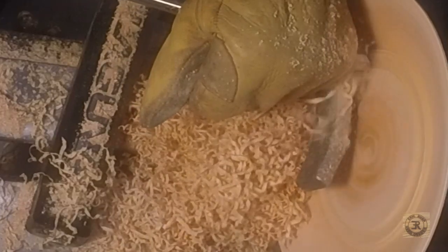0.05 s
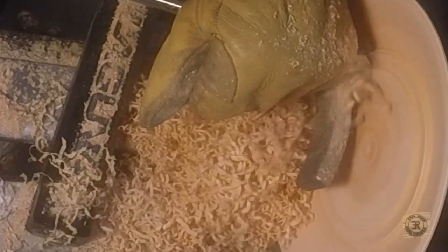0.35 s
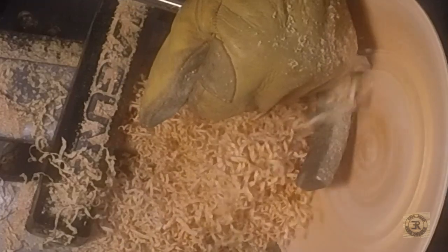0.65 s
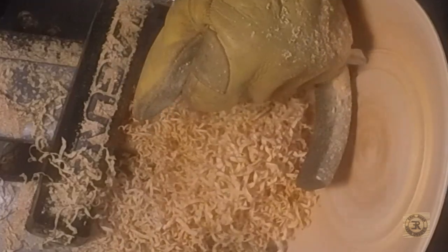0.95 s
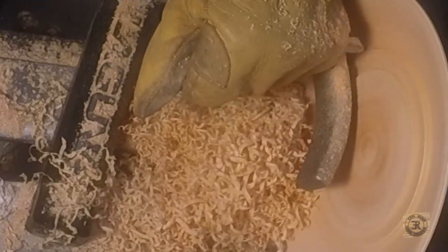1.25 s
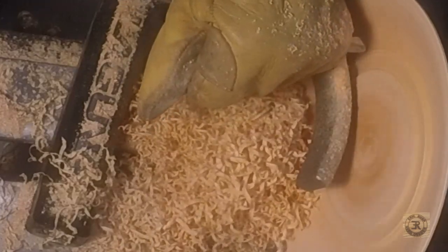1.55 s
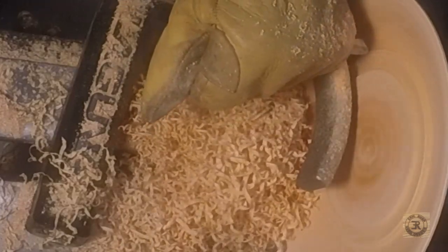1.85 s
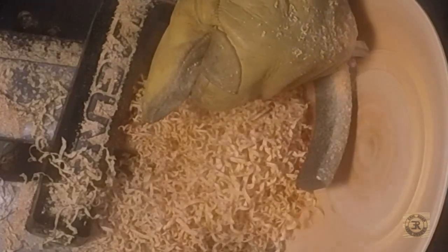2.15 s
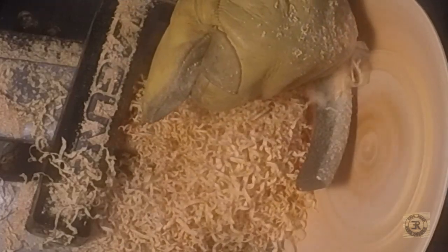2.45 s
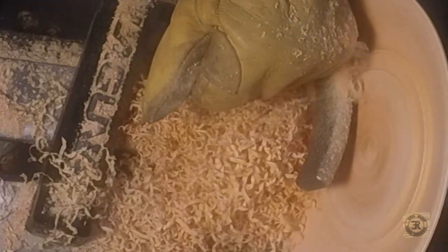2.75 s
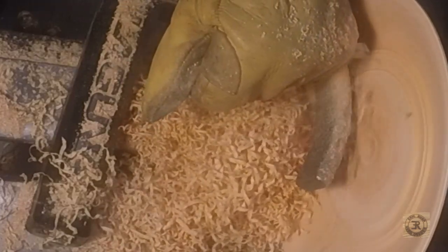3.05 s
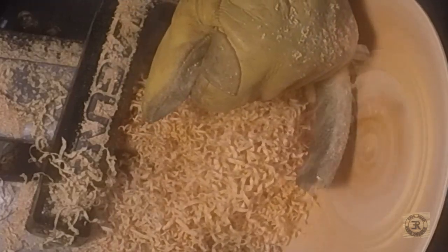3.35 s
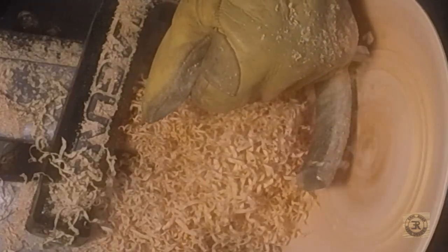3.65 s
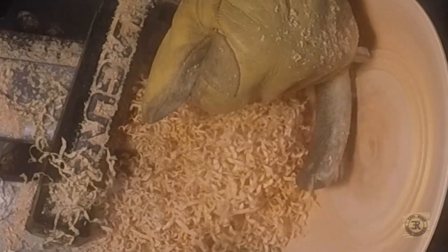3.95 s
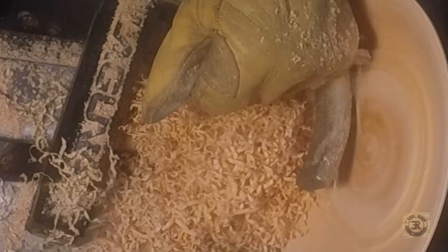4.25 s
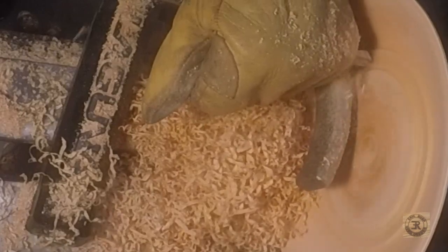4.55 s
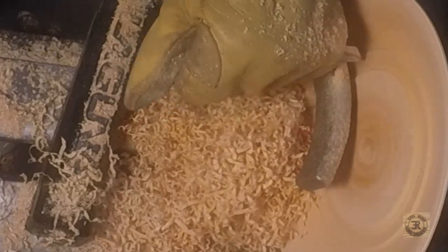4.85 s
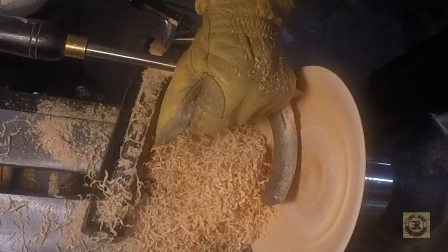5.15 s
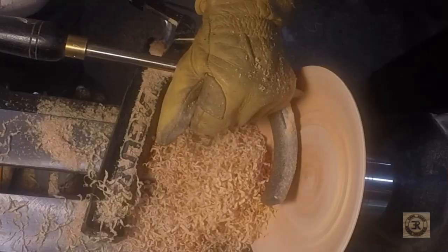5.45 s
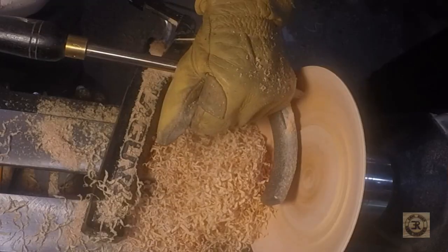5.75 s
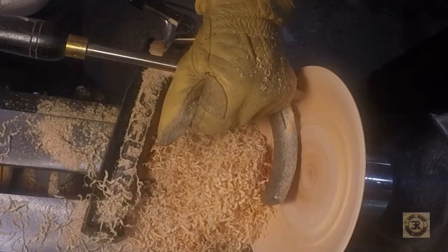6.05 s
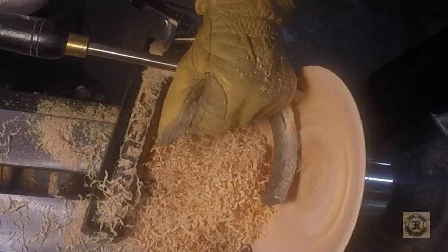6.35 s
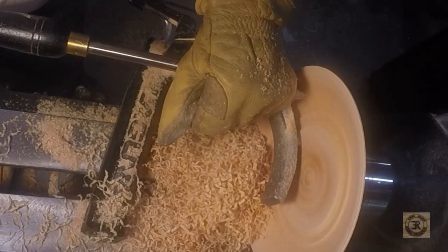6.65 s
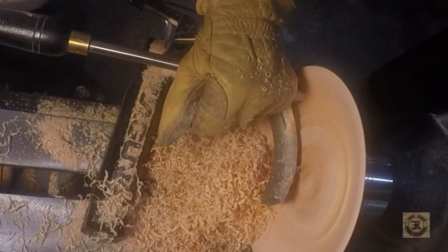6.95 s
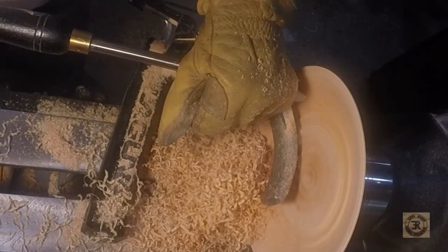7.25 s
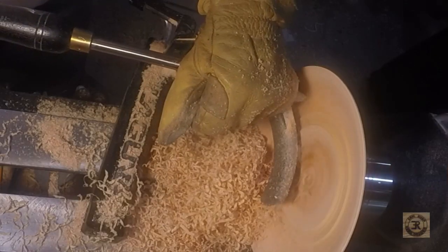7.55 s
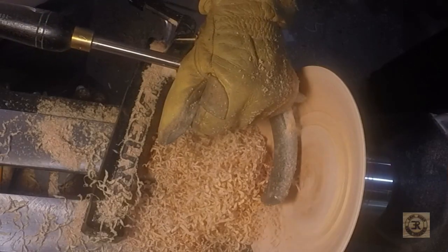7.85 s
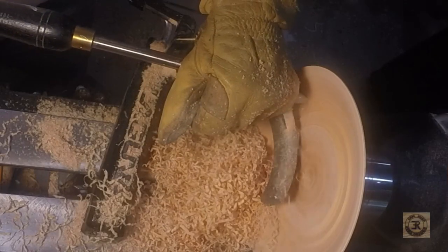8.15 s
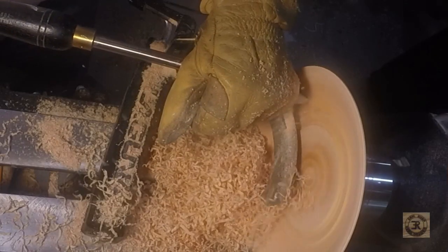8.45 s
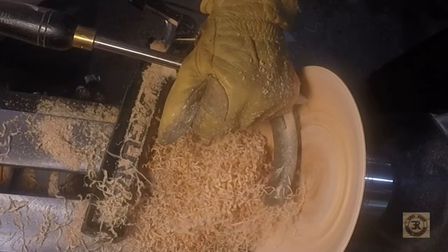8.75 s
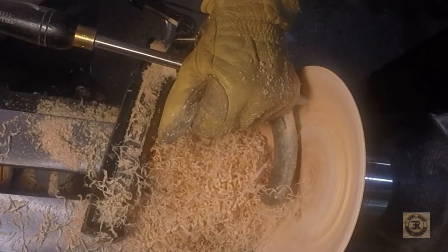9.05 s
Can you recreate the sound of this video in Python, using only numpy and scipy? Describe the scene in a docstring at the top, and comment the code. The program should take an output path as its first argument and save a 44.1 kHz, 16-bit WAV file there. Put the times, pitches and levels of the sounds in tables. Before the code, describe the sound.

Close to a wood lathe in a small workshop, a gouge shaves a thin spinning plate with a pulsing hiss and a short squeal. It lifts, leaving a faint throbbing note and the machine's soft whirr. A second cut rasps and squeals in a fast stutter. After another brief pause the steel edge knocks hard against the wood, then continues with louder squealing chatter, skidding chirps and a few more knocks.

```python
"""A small workshop, close to the lathe: a gouge makes three cuts and one light rub on a thin wooden plate.
Twice a turn the edge meets end grain and the plate bursts into a short falling squeal, slapping the edge
at its widest swings. Tearing fibres hiss and ring the plate and the steel; the last cut adds hard knocks
and a skidding chirp. Between the cuts the free plate sings faintly over the lathe's hum and whirr."""
import sys
import numpy as np
from scipy import signal
from scipy.fft import rfft, irfft, next_fast_len
from scipy.io import wavfile
from scipy.ndimage import uniform_filter1d, map_coordinates

SR = 44100
rng = np.random.default_rng(int(sys.argv[2]) if len(sys.argv) > 2 else 0)


def store_wav(level_fs):
    """Save 16-bit WAV to argv[1]."""
    pcm = np.round(np.clip(np.atleast_2d(level_fs), -1, 1) * 32767)
    wavfile.write(sys.argv[1], SR, pcm.T.astype(np.int16))


N = 401751
T = np.arange(N) / SR

# lathe speed, sinking under load: (time [s], speed [turns/s])
LATHE_SPEED = [(0, 15.48), (.8, 15.55), (2.1, 15.655), (2.7, 15.306), (3.2, 15.5), (3.65, 15.53),
               (4.2, 15.393), (4.75, 15.935), (5.3, 16.236), (5.55, 16.265), (6.35, 15.828), (6.65, 15.854),
               (6.9, 15.774), (7.25, 15.77), (7.75, 15.449), (9.11, 15.481)]
# touches of the gouge, the four rings set against the hiss: (start [s], end [s], plate ring [dB],
# upper ring [dB], tool rest ring [dB], gouge ring [dB], bounce of the hiss [dB],
# lead of the hiss over the squeal [turns], lead of the plate ring [turns])
TOUCHES = [(-.05, 0.789, -5, -3.5, -20, -1.5, 3.7, 0, -.02),
           (2.083, 4.741, -4.5, -3, -14, -2.5, 2.4, 0.12, .18), (4.902, 5.1, 1, 2, 0, -4.5, 1, 0, 0),
           (5.283, 9.2, -4, -10.5, -26, -4, 2, 0, .18)]
LAST_CUT_S = TOUCHES[-1][0]


def squeal(turn, squareness=2.2, slip_rad=.28, jitter_s=.0003, scatter_s=.0012):
    """End grain kicks the plate into a brief flutter every half turn. Returns the squeal and its slaps."""
    # the two end-grain sides, the second shorter and diving faster:
    # (delay [s], rise [s], fall [s], pitch offset [Hz], glide [Hz/s], slap [dB])
    sides = [(-.002, 0.0056, 0.0058, 23, -1500, .5), (.0005, 0.0045, 0.005, 16, -7000, -1)]
    # extra flutter ahead of the first side: (delay [s], length [s], pitch [ratio], level [dB])
    stutter = (-.0095, 0.0041, 0.934, -8)
    # plate resonances that ring on after a flutter: (pitch [Hz], width [Hz], level [dB])
    squeal_modes = [(681, 16, 0), (744, 28, -6)]
    # resonances struck by a slap: (pitch [Hz], width [Hz], level [dB])
    slap_modes = [(1370, 34, 15.5), (1370, 50, 6), (1630, 75, 1), (2180, 47, 10), (2336, 81, 4),
                  (2720, 43, -1), (3700, 350, 1)]
    # how well the plate radiates: (frequency [Hz], level [dB])
    radiation = [(450, -27), (600, -20), (665, 7), (800, -.5), (950, 8), (1300, -5)]
    halves = np.arange(1, int(2 * turn[-1]) + 1)
    times = np.interp(halves / 2, turn, T)
    side = (-1.) ** halves
    level_db, pitch, slap_db, lopsided_db = curves(chatter(), times)
    chance = rng.standard_normal((len(times), 7))
    sizes = engaged(times) * undb(level_db + lopsided_db / 2 * side + 0.7 * chance[:, 0])
    third_db = -14 + 4 * side * np.tanh(lopsided_db)  # the heavier side has a brighter third harmonic
    tone, slaps, grit = np.zeros(N), np.zeros(N), rng.standard_normal(N)
    for i, (t, second_side, size, hz, luck) in enumerate(zip(times, halves % 2, sizes, pitch, chance)):
        delay_s, rise_s, fall_s, offset_hz, glide, side_db = sides[second_side]
        delay_s += jitter_s * luck[1]
        slip = slip_rad * luck[4]
        ragged = touch_number(t) == 1
        if ragged:  # the second cut stutters: looser timing, flatter glide, a late first side
            delay_s += .003 * (1 - second_side) + scatter_s * luck[1] / (1 + second_side)
            glide *= .4
            slip *= 3
        span, age = around(t)
        from_peak = age - delay_s
        width = np.where(from_peak < 0, rise_s, fall_s) * np.exp(.09 * luck[2])
        envelope = np.exp(-np.abs(from_peak / width) ** squareness)
        # the ripple left by the last turn keeps the flutter in step with the rotation
        cycles = (hz + offset_hz + 3 * luck[3]) * age + glide * from_peak ** 2 / 2
        phase = 2 * np.pi * cycles + slip
        tone[span] += size * envelope * np.sin(phase)
        if ragged and not second_side:
            lag_s, length_s, ratio, stutter_db = stutter
            since = from_peak - lag_s - scatter_s * luck[5]
            blip = np.exp(-(since / length_s) ** 2) * np.sin(2 * np.pi * ratio * hz * since)
            tone[span] += size * undb(stutter_db + 2 * luck[6]) * blip
        # at its widest swings the plate slaps the edge: overtones and a little grit
        buzz = np.sin(2 * phase) + undb(third_db[i]) * np.sin(3 * phase) + undb(-13) * np.sin(5 * phase)
        slaps[span] += size * undb(slap_db[i] + side_db) * envelope ** 2 * (buzz + undb(-6.5) * grit[span])
    after_ring = ring(tone, squeal_modes) * undb(-4.2)
    flutter = colour(unit(tone) + after_ring, radiation) * np.std(tone) * undb(10)
    return flutter, band(ring(slaps, slap_modes), 1100, 5300) * np.std(slaps) * undb(3)


def chatter(roundness=1.35, hz_per_db=1.84, sag_hz_per_s=31, settle_s=.74):
    """Chatter swells and dies: rows of (time [s], level [dB], pitch [Hz], slap [dB], lopsidedness [dB])."""
    # swells of the plate's vibration: (peak [s], level [dB], rise over the top 10 dB [s],
    # fall by 10 dB [s], pitch [Hz], slap [dB], first side over second [dB])
    swells = [(.3, -34, 0.44, 0.18, 1112, -2.5, -4), (2.199, -48.5, .12, 3, 810, -8, -6),
              (2.52, -33.3, .28, 0.17, 785, -11.5, -4), (3.119, -23.5, 0.22, 0.51, 776.5, -19, -2),
              (3.45, -32.5, 0.2, 0.4, 740, -21.5, -1), (3.86, -27.5, 0.08, 0.33, 762, -24, -3.5),
              (4.13, -26.5, 0.17, 0.23, 742, -18, 0), (4.27, -30, .1, 0.12, 732, -16, -1),
              (4.57, -33.5, 0.15, .1, 738, -18, -3), (5.33, -20.3, .1, 0.085, 785, -4, -1),
              (5.42, -28.5, .07, 0.13, 770, -5, -7), (5.55, -23, .035, .26, 780, -5, -2),
              (5.87, -25.5, 0.36, 0.16, 773, -19.5, 1), (6.25, -29, 0.43, 0.08, 732, -18.5, 4),
              (6.6, -28, 0.25, 0.22, 784, 0, -7), (6.85, -22, 0.47, 0.2, 764, -10.5, 0),
              (7.13, -23.5, 0.4, .29, 764, -10, -2.5), (7.9, -27, .14, .12, 747, -10, -6),
              (8.06, -24, 0.22, 0.62, 734.5, -11.5, 1), (8.48, -34, .15, 0.5, 736, -5, 2),
              (9.13, -27.5, 0.52, .3, 748, -16, -1)]
    at = T[::200]
    peak_s, peak_db, rise_s, fall_s, hz, slap_db, lopsided_db = np.transpose(swells)[:, :, None]
    age = at - peak_s
    sunk_db = 10 * np.abs(age / np.where(age < 0, rise_s, fall_s)) ** roundness
    same_touch = touch_number(peak_s) == touch_number(at)
    power = undb(peak_db - sunk_db) ** 2 * same_touch + 1e-18
    sunk_db = np.minimum(sunk_db, 20)
    settled = np.tanh(age / settle_s)
    # a wider swing is sharper and slaps harder; a swell's tail is flatter and buzzier than its rise
    traits = (hz - hz_per_db * sunk_db - sag_hz_per_s * age,
              slap_db - sunk_db + 3.5 * settled,
              lopsided_db + .6 * settled)
    blended = [np.average(trait, axis=0, weights=power) for trait in traits]  # the strongest swell leads
    return np.column_stack([at, 10 * np.log10(power.sum(axis=0))] + blended)


def shaving(turn, calm_db=-44, hard_slap_db=-8.5, rest_growth_db_per_s=1.5, mute_from_s=5.056):
    """Tearing fibres hiss and shake the plate, the gouge and the tool rest, pulsing with the rotation."""
    # weight of the shaving, one list per touch: (time [s], hiss [dB], fine hiss [dB])
    feed = [
        [(0.0, -32.5, -49), (0.618, -32.5, -49.5), (0.78, -35, -48.5)],
        [(2.12, -42, -53), (2.22, -42.5, -48.5), (2.29, -46.5, -52), (2.37, -41, -48), (2.92, -35.5, -51.5),
         (3.2, -37, -49.5), (3.5, -40, -53.5), (3.92, -36.5, -48.5), (4.05, -37.5, -49), (4.2, -36.5, -49.5),
         (4.66, -36.5, -49), (4.72, -38, -49)],
        [(4.95, -63, -72), (4.99, -58, -68)],
        [(5.33, -41, -57), (5.47, -49, -69), (5.56, -44.5, -63), (5.85, -44.5, -57), (6.31, -41, -49),
         (6.75, -40, -52.5), (7.12, -47, -58.5), (7.77, -40, -48), (8.05, -45, -54.5), (8.42, -48.5, -57),
         (9.08, -41.5, -49.5)],
    ]
    # spectra of tearing wood and of its finest fibres: (frequency [Hz], level [dB])
    tearing = [(300, -15.5), (700, 0.5), (1500, -2.5), (1850, -6), (2700, -4.5), (3280, -7), (3650, -2),
               (4500, -1.5), (5500, -1.5), (6800, -2.5), (8000, -9.5), (9000, -17), (10000, -21.5),
               (15000, -38)]
    fine_tearing = [(6000, -27), (8800, 5), (9600, -3.5), (11000, -3), (13000, -12.5), (15300, -20)]
    # middle and upper resonances of the plate: (pitch [Hz], width [Hz], level [dB])
    plate_modes = [(1017, 78, -4.5), (1127, 33, 7.5), (1346, 31, -1), (1606, 110, -4)]
    upper_modes = [(1927, 31, -2), (2204, 55, 3.5), (2345, 82, 3.5), (2640, 48, -2), (2722, 30, -1.5),
                   (2994, 54, -1)]
    # resonances of the gouge and the tool rest: (pitch [Hz], width [Hz], level [dB], lean [dB per roll])
    gouge_modes = [(3610, 117, 2, 3.5), (4033, 70, 0.5, -1.5), (4390, 90, -2.5, 0), (5015, 44, 3, 0.5),
                   (5220, 84, -3, -5), (5420, 43, 0, -8.5), (5580, 57, 1, 0), (6475, 114, 0, 7),
                   (6770, 82, -2, -1.5), (7430, 190, -3, 5), (8280, 69, -8.5, 9)]
    rest_modes = [(125.2, 5, 2, -1.5), (173.3, 6, 3.5, -2.5), (207, 17, -8.5, -1.5), (296, 10, 2.5, -1.5),
                  (406, 72, 0, 2), (456, 37, -4, 1), (550, 66, -1.5, 3.5)]
    touch = touch_number()
    hiss_db, fine_db = np.choose(touch, [curves(rows) for rows in feed])
    start, _, plate_db, upper_db, rest_db, steel_db, bounce_db, lead, plate_lead = np.array(TOUCHES)[touch].T
    level_db, _, slap_db, lopsided_db = curves(chatter())
    # the rings follow the hiss; chatter lifts the plate's rings and evens the bounce, hard slaps deepen it
    shake_db = np.maximum(level_db - calm_db, 0)
    plate_db = hiss_db + plate_db + .46 * shake_db
    upper_db = hiss_db + upper_db + .16 * shake_db
    rest_db = hiss_db + rest_db + rest_growth_db_per_s * (T - start)
    bounce_db = bounce_db - .07 * shake_db + .28 * np.maximum(slap_db - hard_slap_db, 0)
    edge = bite(turn + lead, bounce_db, .7 * lopsided_db) * undb(.57 * walk(70) + .42 * walk(500))
    tear = fibres(turn, repeat=.15, grain_db=-.5) * edge
    steel_drive = fibres(turn, repeat=.26, grain_db=5.5) * edge
    plate_drive = fibres(turn, repeat=.66, grain_db=4) * bite(turn + plate_lead, 3.2, -4.5)
    upper_drive = fibres(turn, repeat=.26, grain_db=4) * bite(turn - .01, 4, -2.3)
    rest_drive = fibres(turn, repeat=.06, grain_db=1)
    steel = band(ring(steel_drive, rolled(gouge_modes)), 2880, 8800) * undb(steel_db)
    hiss = unit(colour(tear, tearing) + steel) * undb(hiss_db + .72)
    fine_hiss = colour(tear, fine_tearing) * undb(fine_db - 1.2)
    plate = band(ring(plate_drive, plate_modes), 860, 1433) * undb(plate_db)
    upper = band(ring(upper_drive, upper_modes), 2060, 3095) * undb(upper_db)
    rest = band(ring(rest_drive, rolled(rest_modes)), 66, 660) * undb(rest_db)
    gate = (T < mute_from_s) | (T > LAST_CUT_S)  # the rub's sound is cut off abruptly
    return (hiss + fine_hiss + plate + upper + rest) * engaged() * gate


def fibres(turn, repeat, grain_db):
    """Snapping fibres: fresh grainy noise, with a share `repeat` of the power from the wood's figure."""
    fresh = rng.standard_normal(N) * undb(grain_db * walk(900))
    return np.sqrt(repeat) * figure(turn, size=int(N / turn[-1])) + np.sqrt(1 - repeat) * unit(fresh)


def figure(turn, size, cycle_turns=40):
    """The figure of the wood comes round on every turn, slowly morphing between two patterns."""
    morph = 2 * np.pi * turn / cycle_turns
    place = [turn % 1 * size]
    first, second = (map_coordinates(pattern, place, order=3, mode="grid-wrap")
                     for pattern in rng.standard_normal((2, size)))
    return unit(np.cos(morph) * first + np.sin(morph) * second)


def bite(turn, depth_db, lopsided_db, snap=.28):
    """The edge digs in and eases off at the two end-grain sides, one more than the other."""
    angle = 4 * np.pi * turn
    dig = np.cos(angle) - snap * np.sin(2 * angle) - snap / 2 * np.cos(3 * angle)
    gain = undb(depth_db * dig + lopsided_db / 2 * np.cos(angle / 2))
    return gain / np.sqrt(uniform_filter1d(gain ** 2, int(N / turn[-1])))


def rolled(modes):
    """Rolling the gouge moves the cut along its edge, favouring some resonances and starving others."""
    # roll of the gouge: (time [s], roll [-1 to 1])
    gouge_roll = [(.8, -0.92), (2.1, 0.8), (2.6, 0.9), (3.2, 0.095), (3.75, -0.56), (4.7, -1), (5.4, 0.17),
                  (6.3, 0.41), (9, 0.22)]
    roll = curves(gouge_roll)[0]
    return [(hz, width, db + lean_db * roll) for hz, width, db, lean_db in modes]


def knocks(rise_s=.00093, decay_s=.005):
    """The plate knocks hard on the edge: a short scrunch in the steel and a ping in the wood."""
    # knocks in the last cut: (time [s], steel [dB], ping [dB])
    hits = [(5.292, -42.5, -57), (5.321, -36, -40), (5.354, -32, -32), (5.415, -34, -34),
            (5.475, -36.5, -39), (5.538, -32, -31.5), (5.598, -34, -40), (5.66, -40, -40),
            (6.705, -50, -36), (6.767, -40, -34), (8.232, -41, -36), (8.425, -48, -43), (8.488, -48, -33.5),
            (9.073, -38, -33.5)]
    # resonances of the plate's ping: (pitch [Hz], width [Hz], level [dB])
    ping_modes = [(2178, 62, 2.5), (2310, 83, -1)]
    # spectrum of the knocked steel: (frequency [Hz], level [dB])
    steel_colour = [(1500, -16), (2700, -6), (3200, -6), (3900, 6), (4400, -6), (4900, 1), (6000, -6),
                    (6800, -5.5), (8500, -15), (12000, -33)]
    steel, ping = np.zeros(N), np.zeros(N)
    for t, steel_db, ping_db in hits:
        span, age = around(t)
        envelope = np.exp(-np.where(age < 0, (age / rise_s) ** 2, age / decay_s))
        steel[span] += undb(steel_db) * envelope
        ping[span] += undb(ping_db) * envelope
    push = ping * sum(np.sin(2 * np.pi * hz * T + .72 * walk(150)) for hz, _, _ in ping_modes)
    return steel * colour(rng.standard_normal(N), steel_colour) + ring(push, ping_modes) * np.std(ping)


def skid(turn, start_ratio=2.15, drop=1.1, bend=1.3, rough_rad=.9):
    """Once a turn the edge skids over softer grain: a rough chirp diving about an octave to the squeal."""
    # strength of the skid in the last cut: (time [s], level [dB])
    skid_level = [(5.3, -35), (5.36, -35.5), (5.45, -50), (5.58, -39), (5.9, -48), (6.35, -45),
                  (6.75, -34.5), (7.1, -44), (7.5, -56), (7.88, -41.5), (8.3, -55)]
    # resonances rung by the chirp: (pitch [Hz], width [Hz], level [dB])
    skid_modes = [(920, 120, 4), (1160, 65, 2), (1355, 40, 2), (1630, 70, -3)]
    progress = np.minimum(2 * (turn % 1), 1)  # the chirp lasts half a turn
    squeal_cycles = curves(chatter())[1] / (2 * curves(LATHE_SPEED)[0])
    cycles = squeal_cycles * (start_ratio * progress - drop * progress ** (bend + 1) / (bend + 1))
    envelope = np.sin(np.pi * progress ** .88) * undb(3.2 * walk(300))
    chirp = envelope * np.sin(2 * np.pi * cycles + rough_rad * figure(turn, size=44) + .6 * walk(600))
    sound = unit(unit(chirp) + undb(5) * ring(chirp, skid_modes))
    return sound * undb(curves(skid_level)[0]) * engaged() * (T > LAST_CUT_S)


def free_plate(throb_hz=6.7, sag_hz=17.8, sag_s=.221, fade_s=.033):
    """Undamped between cuts, the plate sings a throbbing note that sags as the edge comes back."""
    # spells of singing: (start [s], end [s], pitch [Hz], level [dB], throb [dB])
    spells = [(0.857, 2.154, 861, -52.5, 5.5), (4.797, 5.301, 851, -53.5, 1.5)]
    beat = 2 * np.pi * throb_hz * T + .6 * walk(3)
    note = 0
    for start, end, hz, db, throb_db in spells:
        throb = unit(undb(throb_db * (np.cos(beat) - np.cos(2 * beat) / 2) + walk(18)))
        pitch = hz - sag_hz * np.exp(np.minimum(T - end, 0) / sag_s)
        phase = 2 * np.pi * np.cumsum(pitch) / SR + .21 * walk(20)
        gate = np.clip(1 + np.minimum(T - start, end - T) / fade_s, 0, 1)
        note += throb * gate * undb(db) * np.sqrt(2) * np.sin(phase)
    return note


def lathe(turn, whirr_db=-51):
    """The spinning plate rings faintly over the lathe's low hum and the whirr of belt and bearings."""
    # faint steady tones, the plate's rings above 1 kHz and the lathe's hum below: (pitch [Hz], level [dB])
    steady_tones = [(1012, -68), (1142, -63), (1380, -70), (1675, -72), (484, -65), (124.5, -70),
                    (188.3, -68)]
    # spectrum of belt and bearings: (frequency [Hz], level [dB])
    whirr_colour = [(25, -16), (70, -9), (120, -9), (280, -5.5), (350, -14), (475, -3.5), (770, -7.5),
                    (900, 3.5), (1150, -3.5), (1280, -11.5), (1550, -16), (2200, -10), (2700, -22.5),
                    (6500, -32.5), (15000, -44)]
    tones = sum(undb(db + 1.7 * walk(12)) * np.sqrt(2) * np.sin(2 * np.pi * hz * T + .65 * walk(14))
                for hz, db in steady_tones)
    whirr = colour(fibres(turn, repeat=.49, grain_db=1), whirr_colour)
    return tones + whirr * undb(whirr_db + .25 * walk(7.8))


def workshop(x, t60_s=.25, damp_hz=5000):
    """Dense, short reflections from the lathe bed and the walls."""
    age = T[:SR // 2]
    tail = rng.standard_normal(len(age)) * undb(-60 * age / t60_s) * (age > .004)
    tail = signal.sosfilt(signal.butter(1, damp_hz, fs=SR, output="sos"), tail / np.sqrt(np.sum(tail ** 2)))
    return signal.fftconvolve(x, tail)[:N]


def engaged(at=T, attack_s=.041, release_db_per_s=209):
    """The edge enters the wood quickly, holds, and the cut dies away when it lifts."""
    start, end = np.array(TOUCHES)[touch_number(at), :2].T
    return np.clip((at - start) / attack_s, 0, 1) * undb(-release_db_per_s * np.maximum(at - end, 0))


def touch_number(at=T):
    """Which touch began last, counting from zero."""
    return sum(at >= row[0] for row in TOUCHES[1:])


def around(t):
    """The samples near a moment, and their age in seconds."""
    span = slice(max(int((t - .025) * SR), 0), int((t + .035) * SR))
    return span, T[span] - t


def ring(x, modes):
    """Drive a set of resonances; unit rms."""
    return unit(sum(undb(db) * signal.lfilter(*signal.iirpeak(hz, hz / width, SR), x)
                    for hz, width, db in modes))


def colour(x, points):
    """Equalise through (frequency [Hz], level [dB]) points; unit rms."""
    hz, db = np.transpose(points)
    size = next_fast_len(N)
    f = np.maximum(np.fft.rfftfreq(size, 1 / SR), 1)
    gain = undb(np.interp(np.log(f), np.log(hz), db))
    return unit(irfft(rfft(x, size) * gain, size)[:N])


def band(x, low_hz, high_hz):
    """Keep the range in which a part radiates; unit rms."""
    return unit(signal.sosfilt(signal.butter(3, [low_hz, high_hz], "bandpass", fs=SR, output="sos"), x))


def walk(rate_hz):
    """Smooth random wobble; unit rms."""
    step = int(SR / rate_hz)
    return unit(uniform_filter1d(np.repeat(rng.standard_normal(N // step + 1), step), step)[:N])


def curves(rows, at=T):
    """The columns of a table, joined by straight lines in time."""
    times, *columns = np.transpose(rows)
    return [np.interp(at, times, column) for column in columns]


def undb(db):
    """Decibels to gain."""
    return 10 ** (np.asarray(db) / 20)


def unit(x):
    """Scale to an rms of one."""
    return x / np.sqrt(np.mean(x ** 2))


def scene():
    """One rotation drives squeal, shaving and machine; the cutting sounds feed the room."""
    turn = np.cumsum(curves(LATHE_SPEED)[0]) / SR
    flutter, slaps = squeal(turn)
    impacts = slaps + knocks()
    cut = shaving(turn) + skid(turn)
    room = workshop(undb(-18) * flutter + undb(-10) * impacts + undb(-15) * cut)
    return (flutter + impacts + cut + lathe(turn) + free_plate() + room)[None]


def record(dry):
    """The microphone's top is cut steeply at 15250 Hz."""
    return signal.sosfilt(signal.ellip(10, .2, 80, 15250, fs=SR, output="sos"), dry)


dry = scene()
out = record(dry)
store_wav(out)
```